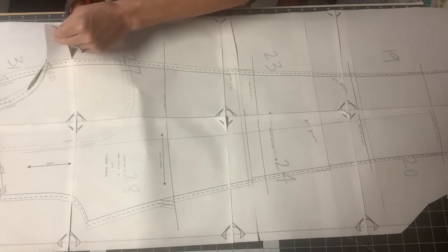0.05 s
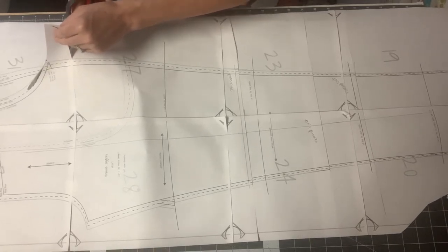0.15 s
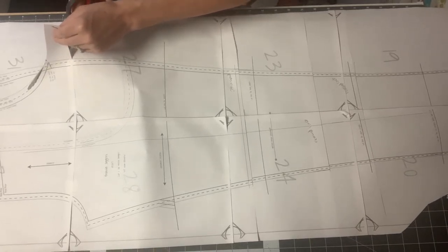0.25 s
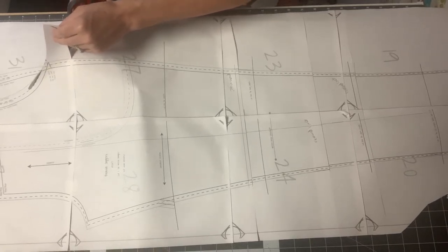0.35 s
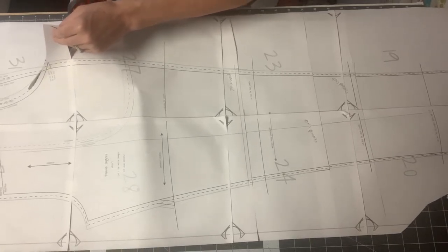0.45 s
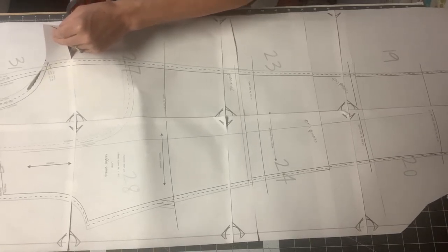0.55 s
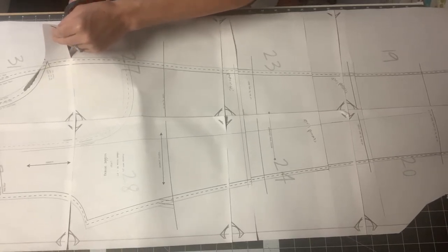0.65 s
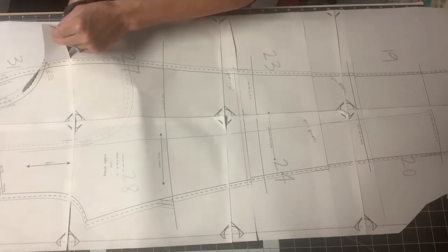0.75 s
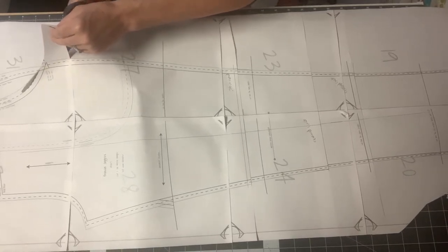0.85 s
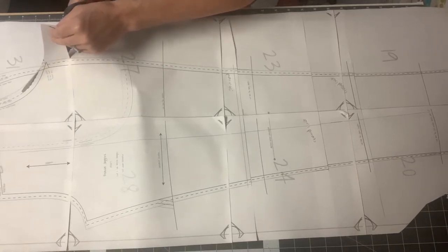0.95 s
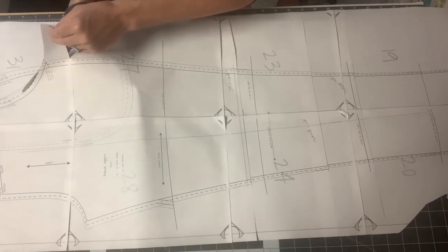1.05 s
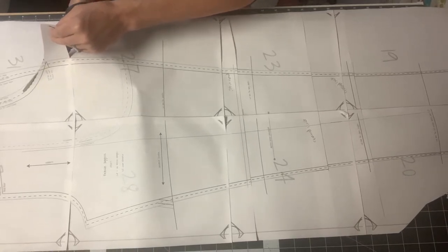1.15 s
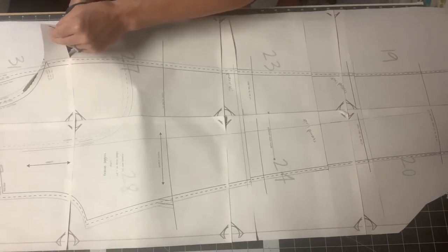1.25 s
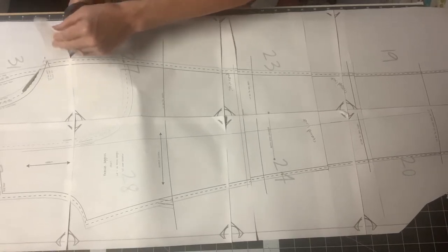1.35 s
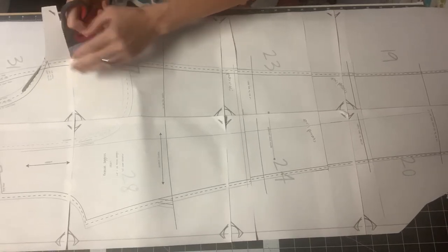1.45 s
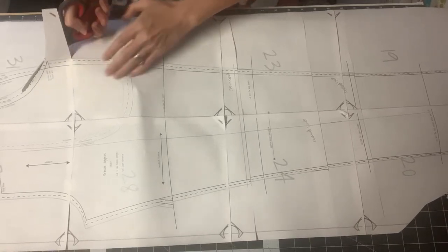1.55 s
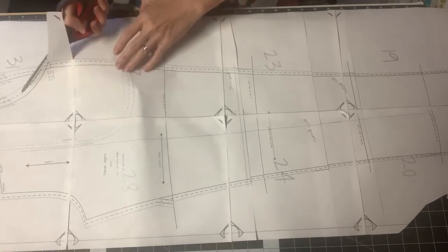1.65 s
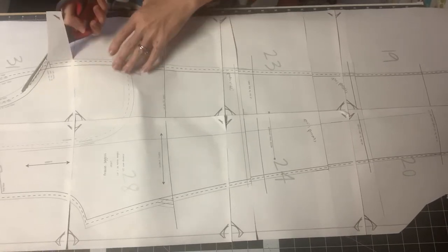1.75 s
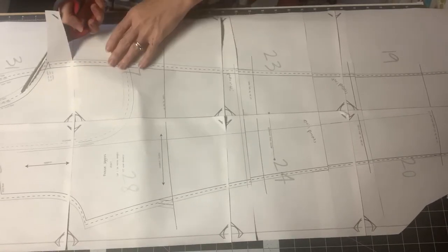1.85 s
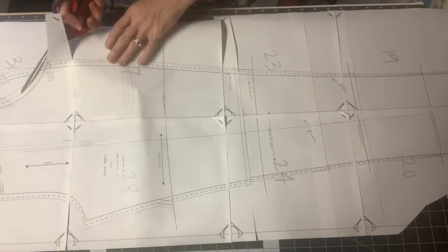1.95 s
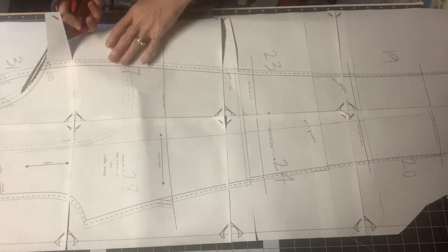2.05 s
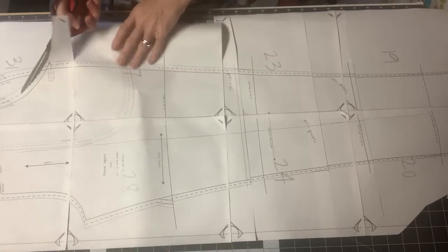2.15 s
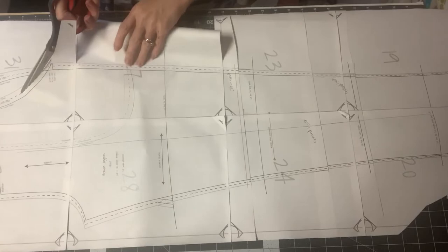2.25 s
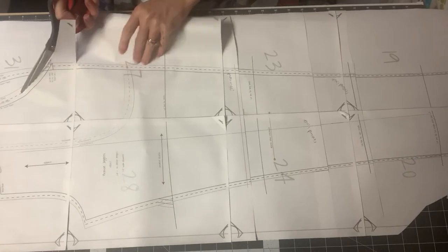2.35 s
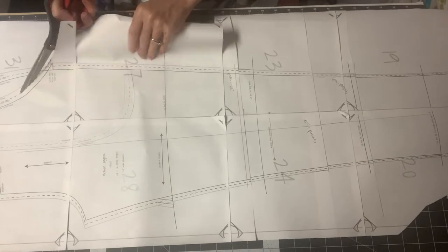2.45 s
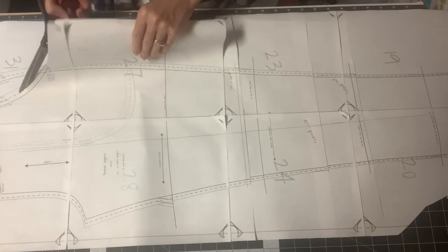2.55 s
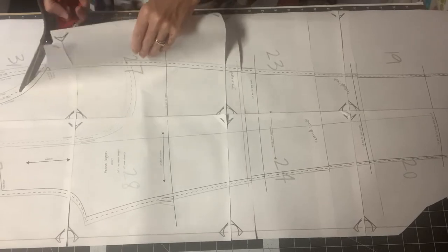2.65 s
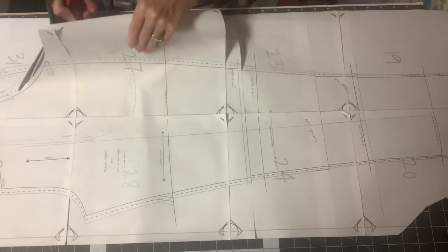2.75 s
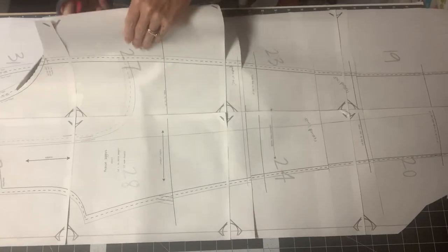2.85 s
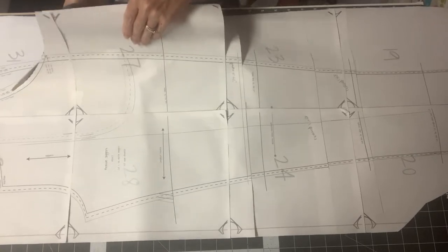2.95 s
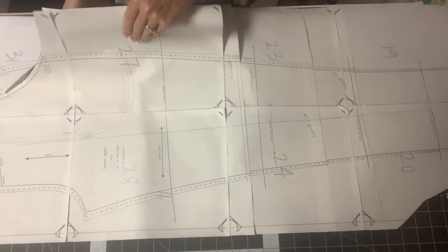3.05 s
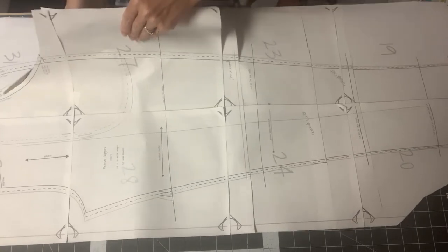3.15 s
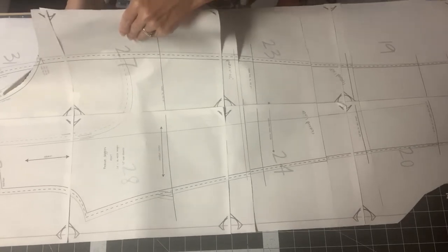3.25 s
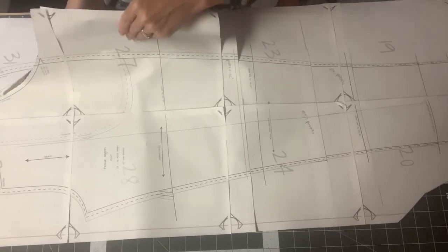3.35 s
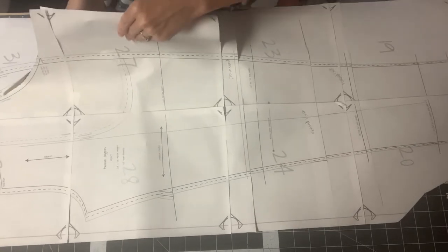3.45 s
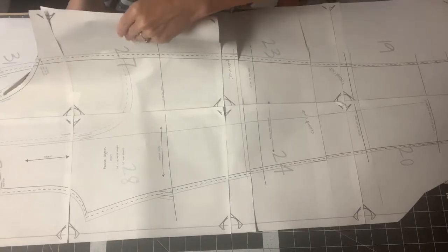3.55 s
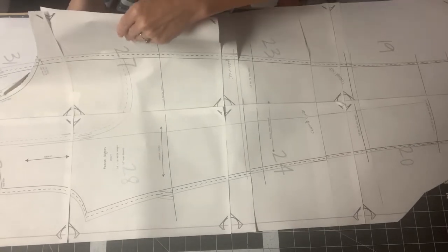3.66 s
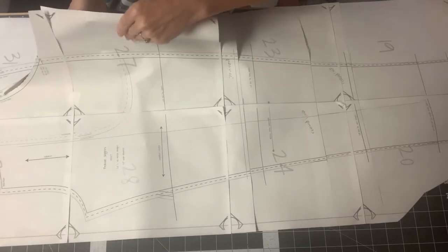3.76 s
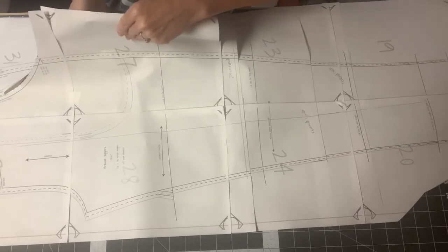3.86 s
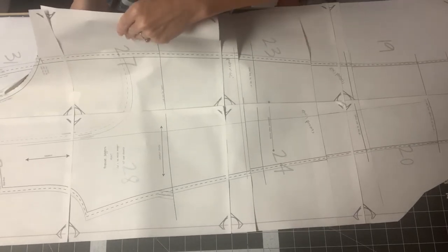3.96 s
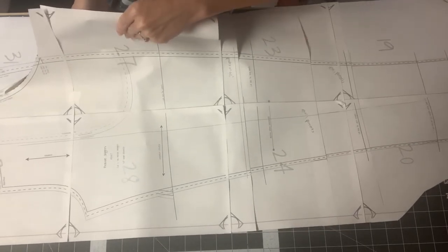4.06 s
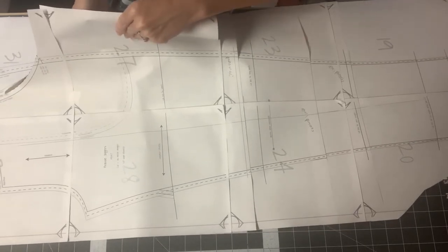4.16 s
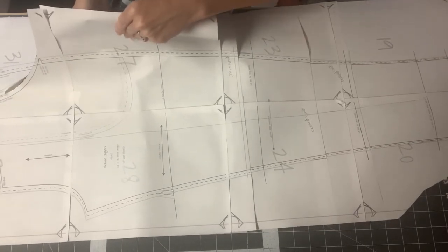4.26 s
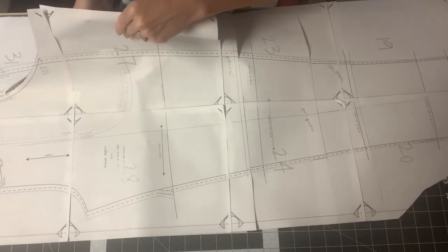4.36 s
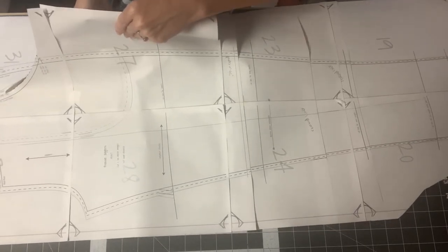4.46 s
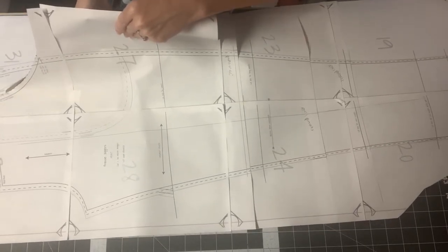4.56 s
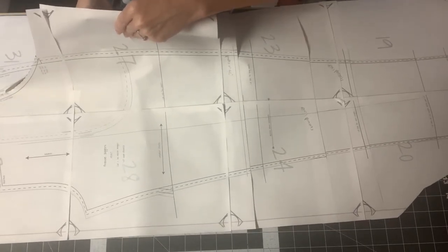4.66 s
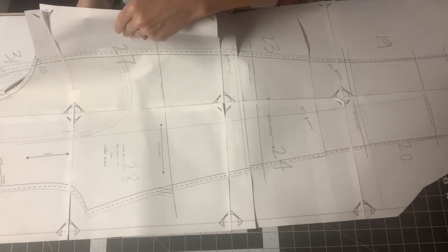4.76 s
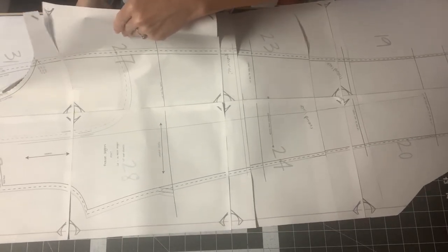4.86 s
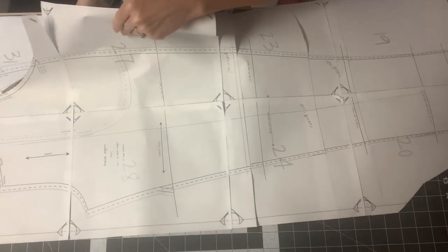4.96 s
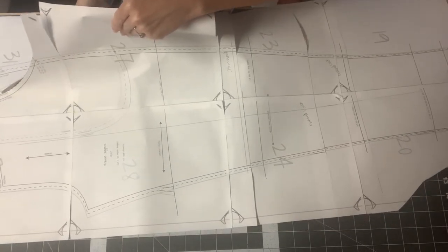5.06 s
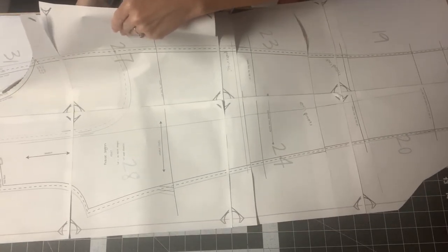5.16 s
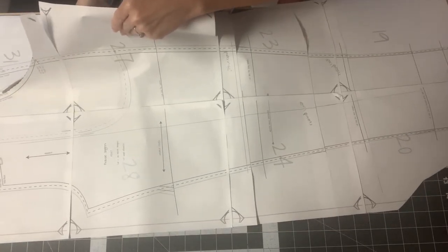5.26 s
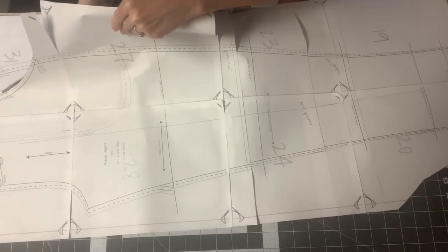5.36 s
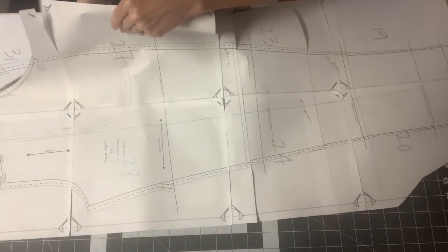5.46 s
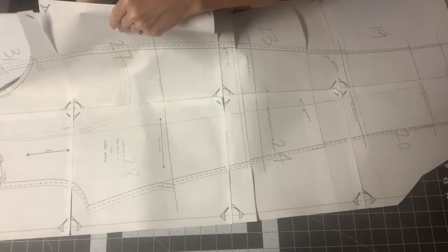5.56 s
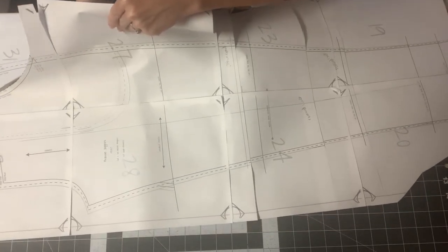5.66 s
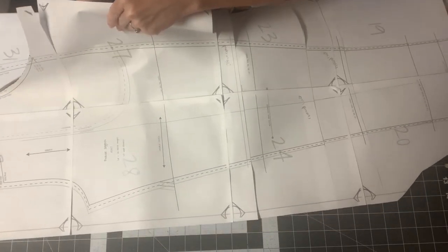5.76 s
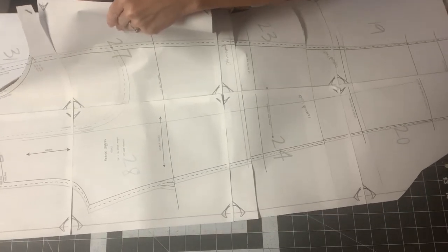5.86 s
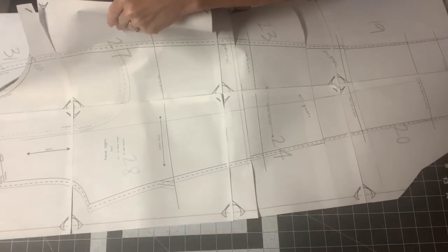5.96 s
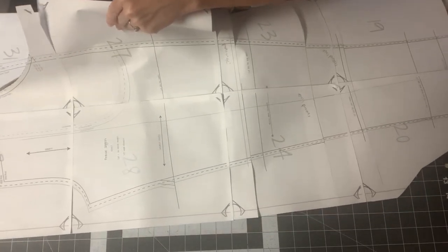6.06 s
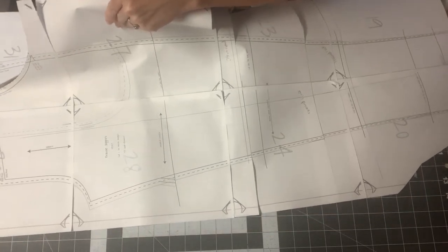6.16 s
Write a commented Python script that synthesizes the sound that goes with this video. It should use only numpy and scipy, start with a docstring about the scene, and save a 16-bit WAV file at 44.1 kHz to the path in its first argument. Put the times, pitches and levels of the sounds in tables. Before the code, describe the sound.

A close stereo microphone pair catches a big sheet of paper handled on a table. Small crisp snips and soft hand strokes start sparsely, then folding brings dull crunches, brittle snaps, swishing rustle and soft low puffs of air. Activity thins to tiny irregular ticks, with a few firmer snips and slides near the end. The room is small, with a very short tail and quiet building rumble.

```python
"""Hands slide over a large paper sewing pattern on a table in a small, quiet room, and short snips begin.
Then the lifted and folded sheet buckles in duller crunches; snips, buckles and strokes mix to the end.
Snips, buckles and sliding are filtered trains of tiny clicks; flaps are damped modes of the sheet,
and puffs are low noise. A close microphone pair hears them with reflections, over rumble and airy hiss."""
import sys
import numpy as np
from scipy import signal
from scipy.fft import rfft, irfft
from scipy.io import wavfile
from scipy.ndimage import uniform_filter1d

SR = 44100
rng = np.random.default_rng(int(sys.argv[2]) if len(sys.argv) > 2 else 0)


def persist_wave(psi):
    """Save psi, clipped to +-1, as 16-bit WAV."""
    counts = np.round(np.clip(psi, -1, 1) * 32767).astype(np.int16)
    wavfile.write(sys.argv[1], SR, np.atleast_2d(counts).T)


N = 273861
TIME = np.arange(N) / SR
HZ = np.fft.rfftfreq(N, 1 / SR)

# Event levels below stand before the band gains, the resonances and the room.
# Fibres breaking in sharp snips and snaps; bright_db raises the treble and lowers the body:
# start_s [s], length_s [s], level_db [dB], bright_db [dB]
SNIP_EVENTS = [(0.23, 0.02, -55.5, 0.5), (0.251, 0.014, -51.5, -1), (0.351, 0.015, -62.5, 0.5),
               (0.5095, 0.0062, -41, 3), (0.553, 0.0067, -52.5, -0.5), (1.157, .01, -57.5, 2.5),
               (1.224, .0031, -52.5, -1.5), (1.253, 0.0056, -54.5, -3), (1.347, 0.0028, -43, 9),
               (1.3501, 0.0028, -40, 1), (1.375, 0.0047, -49, -3), (2.511, 0.0087, -46, 9),
               (2.5286, .0027, -37, 8), (2.724, 0.0038, -39.5, 1.5), (2.734, 0.0032, -26, 1),
               (3.09, .0034, -39.5, -4), (3.211, .0018, -42.5, 1), (3.606, 0.01, -58, -6.5),
               (3.755, .016, -56.5, -3.5), (3.816, 0.0093, -54.5, 0.5), (3.829, 0.011, -54, -5.5),
               (3.865, 0.0065, -55, 5), (3.872, 0.009, -50, -0.5), (3.884, .0083, -56, 2),
               (4.069, .011, -57, -2.5), (4.135, 0.0069, -56, 0), (4.152, 0.0049, -58, -1.5),
               (4.211, 0.0059, -52, -3), (4.241, 0.005, -50.5, -1), (4.302, 0.0042, -51, 1),
               (4.512, 0.016, -53, -1), (4.525, .014, -55, -0.5), (4.648, 0.0069, -51.5, -1),
               (4.687, 0.0065, -49, -0.5), (4.707, 0.0098, -59, -5.5), (5.279, 0.0064, -47, -1.5),
               (5.3, .0025, -41, -1), (5.3301, 0.0094, -41, 0.5), (5.4, 0.002, -48.5, -3),
               (5.426, 0.0037, -50, -2), (5.897, 0.0024, -35.5, 3), (5.903, .0029, -36.5, 1.5),
               (5.942, 0.0046, -44.5, 0), (5.959, 0.0068, -58, 1)]
# Relative spectrum of a snip: frequency_hz [Hz], density_db [dB per Hz]
SNIP_SPECTRUM = [(300, -1.5), (600, -5), (800, -3), (1100, -4), (1600, -5), (2200, -5), (3500, -5.5),
                 (5500, -10), (7000, -13), (8300, -10), (11500, -19.5), (15000, -23.5)]
# Buckling of the sheet; depth_db raises the body and lowers the crunch:
# start_s [s], length_s [s], crunch_top_hz [Hz], level_db [dB], depth_db [dB]
BUCKLE_EVENTS = [(0.626, .008, 1940, -62, -1), (0.685, 0.0037, 1980, -50, -8),
                 (1.5, 0.0059, 2210, -51.5, 0.5), (1.7416, 0.0026, 2240, -43, -3.5),
                 (1.971, 0.011, 4250, -49, -4), (1.986, .021, 4060, -45.5, -6.5),
                 (1.992, 0.014, 4080, -37, -2.5), (2.006, 0.012, 4040, -44.5, -1.5),
                 (2.07, 0.036, 4020, -49.5, -7.5), (2.114, 0.007, 3660, -50, -4.5),
                 (2.164, .0065, 3440, -57.5, -6), (2.224, 0.06, 3500, -61, -7),
                 (2.276, 0.083, 3530, -61, -10), (2.344, 0.0026, 4440, -35.5, -6.5),
                 (2.3538, 0.0026, 3330, -35.5, -7.5), (2.36, 0.023, 3430, -47, -5.5),
                 (2.43, 0.004, 2900, -50.5, -1.5), (2.515, 0.0088, 3350, -39.5, -6.5),
                 (2.528, 0.011, 2720, -38.5, -7.5), (2.618, 0.0015, 3360, -32, 2),
                 (2.633, 0.0017, 2010, -44.5, 7.5), (2.662, 0.0068, 1500, -48.5, 8.5),
                 (2.691, 0.015, 1500, -57.5, 8), (2.737, .0088, 3600, -37, -1.5),
                 (2.782, 0.008, 1530, -54.5, 7), (2.943, 0.023, 2000, -55.5, -1),
                 (3.058, 0.011, 1730, -50, 10.5), (3.238, .023, 1590, -61.5, 6),
                 (3.453, 0.006, 1800, -64, 11), (3.517, 0.026, 2070, -57.5, 4.5),
                 (3.942, 0.021, 2090, -60.5, 5.5), (4.998, .0036, 1790, -47, 9),
                 (5.048, 0.0044, 4600, -41, 7.5), (5.68, 0.0081, 1700, -53, 6),
                 (6.168, 0.0032, 1310, -69, 13.5)]
# Relative spectrum of a buckle: frequency_hz [Hz], density_db [dB per Hz]
BUCKLE_SPECTRUM = [(120, -2), (200, 3.5), (372, -9), (1100, -8.5), (1520, -5), (2320, -0.5), (2630, 0),
                   (7070, -7.5), (8490, -7), (12000, -15.5), (15800, -15.5)]
# Flaps of the released sheet against the table: start_s [s], level_db [dB]
FLAP_EVENTS = [(.252, -57), (.354, -62.5), (0.515, -52.5), (1.16, -59.5), (1.228, -59), (1.353, -46.5),
               (1.995, -51.5), (2.346, -50), (2.739, -62), (3.092, -59.5), (3.215, -56), (3.608, -54),
               (3.757, -58.5), (3.832, -55), (3.87, -51), (4.07, -64.5), (4.153, -60.5), (4.242, -58.5),
               (4.303, -59), (4.527, -54), (4.649, -51.5), (5.051, -52), (5.281, -52), (5.332, -51),
               (5.403, -53.5), (5.428, -58.5), (5.903, -50.5), (5.944, -50.5)]
# Modes of the loose sheet, pitch before detuning: pitch_hz [Hz], level_db [dB], t60_s [s]
SHEET_MODES = [(117, 4.5, 0.046), (215.8, -5.5, 0.19), (242, -3, 0.047), (321.7, 3, 0.092),
               (391.3, -3.5, 0.1), (574, -20.5, 0.044), (693.6, 3, 0.06)]
# Strokes of paper on paper and skin; body and hiss are relative to the rustle:
# start_s [s], length_s [s], rustle_db [dB], body_db [dB], hiss_db [dB]
STROKE_EVENTS = [(.005, 0.028, -63, -4, -6), (0.181, 0.13, -67, -9, -7), (0.51, 0.054, -58.5, -2, -11),
                 (0.607, 0.049, -75, 8, -16), (0.704, 0.023, -59.5, 6.5, -15), (0.754, 0.13, -54, -0.5, -5),
                 (0.897, .095, -67.5, -5, -3.5), (1.122, .17, -73.5, -7, 0.5), (1.355, .04, -65, -2, -1),
                 (1.51, 0.14, -54.5, -0.5, -12), (1.677, 0.045, -61, -1, -18),
                 (1.761, 0.054, -53.5, -5, -5), (1.927, 0.0087, -55, -12, -9.5),
                 (1.993, 0.1, -54.5, -1, -9), (2.101, 0.032, -56, -3, 3), (2.186, 0.16, -53, -6.5, -17.5),
                 (2.352, 0.054, -50.5, -8, 1.5), (2.496, .1, -51, -7, 0.5), (2.623, 0.071, -50.5, 3, 0),
                 (2.739, 0.062, -51, 2, 2), (2.829, 0.038, -54.5, -4, -2.5), (2.909, 0.12, -58.5, -1.5, -4),
                 (3.055, 0.082, -50.5, -2.5, -6.5), (3.147, 0.091, -54.5, -8, -0.5),
                 (3.232, .06, -51, 2.5, -2), (3.335, 0.066, -63.5, -3.5, -3.5),
                 (3.42, 0.049, -56, 0.5, -8.5), (3.544, 0.18, -72, -4.5, -7), (3.814, 0.095, -65, 4, -3.5),
                 (4.067, 0.094, -65.5, 0.5, -5), (4.25, 0.053, -65, 5, 1), (4.523, 0.034, -76, 9, 4),
                 (4.669, 0.038, -63.5, 5, -1.5), (4.912, 0.12, -58.5, 1, -10),
                 (4.992, 0.091, -56, 0.5, -10.5), (5.128, 0.11, -67.5, 0.5, -4.5),
                 (5.337, 0.048, -65.5, 6, -2), (5.576, 0.1, -51.5, -0.5, -5.5),
                 (5.752, 0.047, -67, 11, -11), (5.812, 0.047, -59, 5, -0.5), (5.935, 0.051, -64, 4.5, 0.5),
                 (6.093, .1, -71.5, -5, -4)]
# Relative spectrum of sliding paper: frequency_hz [Hz], density_db [dB per Hz]
SLIDE_SPECTRUM = [(250, -8), (420, -4), (600, -4.5), (850, -2.5), (1100, -3.5), (1700, 0.5), (2600, -7.5),
                  (3600, -9), (5500, -13), (8300, -17), (11500, -25), (15000, -29)]
# Soft pushes of air from the moving sheet: start_s [s], length_s [s], level_db [dB]
PUFF_EVENTS = [(0.665, 0.17, -69.5), (1.348, .064, -54), (2.05, 0.13, -58.5), (2.321, .07, -52.5),
               (2.611, 0.12, -53), (2.71, 0.1, -54.5), (3.039, 0.055, -59.5), (3.125, 0.11, -54),
               (5.592, .11, -58.5)]
# Resonances of the space between paper, table and body: pitch_hz [Hz], width_hz [Hz], level_db [dB]
HOLLOW_MODES = [(602, 110, -9.5), (991, 40, -5.5), (1300, 22, -11), (1480, 33.1, -6), (1614, 33, -2.5),
                (2240, 20, -3.5), (2900, 39, -20.5), (3164, 29, -9)]
# Decay time of the room: frequency_hz [Hz], t60_s [s]
ROOM_DECAY = [(150, 0.19), (500, 0.17), (1500, 0.08), (4000, 0.15), (8000, 0.12), (15000, 0.15)]
# Sound the two microphones do not share: frequency_hz [Hz], level_db [dB]
UNSHARED_LEVEL = [(150, -15.5), (1000, -12.5), (2500, -3.5), (4500, -2.5), (8000, -8), (15000, -27.5)]
# Balance of the pair, left minus right: frequency_hz [Hz], difference_db [dB]
PAIR_BALANCE = [(250, 0.74), (1000, 0.17), (2500, -2), (4000, -0.93), (6000, -0.7), (12000, 0.42)]
# Phase lag of the right side: frequency_hz [Hz], lag_rad [rad]
RIGHT_LAG = [(0, 0), (1800, .25), (3000, .7), (4600, 3.1), (7150, 9.4), (9550, 15.7), (16800, 34.6)]
# Relative spectrum of the building's rumble: frequency_hz [Hz], density_db [dB per Hz]
RUMBLE_SPECTRUM = [(12, -44), (20, -13.5), (38, -3), (64, 0), (80, -1.5), (96, -15), (113, -5.5), (129, -8),
                   (171, -41), (190, -24), (250, -72.5), (420, -120)]
# Relative spectrum of the airy hiss: frequency_hz [Hz], density_db [dB per Hz]
AIR_SPECTRUM = [(170, 0), (300, -12), (600, -17), (900, -29.5), (1600, -28.5), (3000, -35.5), (5500, -35),
                (8000, -38), (11000, -48.5), (14000, -58.5)]

STRAIN_S = .008  # the paper strains audibly for this long before it gives
# A stroke swells, sags while it is held and dies away; resting hands keep up a faint rustle.
SWELL_DB_PER_S, SAG_DB, RELEASE_DB_PER_S, REST_DB = 522, 2, 349.5, -91
EDGE_HZ = 16050  # upper band limit of the recorder


def gain_of(db):
    """Level principle: amplitude is ten to the power of decibels over twenty."""
    return 10 ** (np.asarray(db) / 20)


def evened(x):
    """Normalisation: the signal is scaled to a root mean square of one."""
    return x / np.sqrt(np.mean(x ** 2) + 1e-20)


def at_level(x, db, length):
    """Energy equivalence: each channel gets the energy of a steady level db held for length seconds."""
    energy = (x ** 2).sum(1, keepdims=True) + 1e-20
    return x * gain_of(db) * np.sqrt(length * SR / energy)


def read(points, hz):
    """Interpolation of a table along a logarithmic frequency axis."""
    table_hz, value = np.transpose(points)
    return np.interp(np.log(hz + 1), np.log(table_hz + 1), value)


def add(mix, s, sound):
    """Superposition: a sound is summed into the mix from time s, cut at the end."""
    part = mix[:, round(s * SR):][:, :sound.shape[1]]
    part += sound[:, :part.shape[1]]


def band(x, lo_hz, hi_hz, order=3):
    """Causal Butterworth band-pass filtering."""
    edges_hz = [lo_hz, min(hi_hz, .48 * SR)]
    return signal.sosfilt(signal.butter(order, edges_hz, "bandpass", fs=SR, output="sos"), x)


def click(spectrum, size=1024):
    """Minimum phase: the Hilbert transform of a log spectrum gives its causal click."""
    level_db = np.maximum(read(spectrum, abs(np.fft.fftfreq(size, 1 / SR))), -70)
    log_gain = np.log(gain_of(level_db))
    return np.fft.ifft(np.exp(np.conj(signal.hilbert(log_gain)))).real[None, :size // 2]


def fibres(size, per_s, spread_db):
    """Random point process: clicks of uneven size, in a shared train and one the microphones do not share."""
    sizes = gain_of(spread_db * np.minimum(rng.exponential(1, (2, size)), 4))
    strengths = sizes * rng.standard_normal((2, size))
    return strengths * (rng.random((2, size)) < per_s / SR)


def burst(length, rise, fall, per_s, spread_db, colour, size=4096):
    """Fracture after strain: clicks creep in, break loose and die away; the bent patch resonates with them."""
    t = np.arange(size) / SR - STRAIN_S
    creep = 0.18 * np.exp(np.minimum(t, 0) / 0.0034)
    onset = creep + 1 - np.exp(-np.maximum(t, 0) / rise)
    decay = np.exp(-np.maximum(t - length, 0) / fall - .5 * np.clip(t / length, 0, 1))
    train = fibres(size, per_s, spread_db) * onset * decay
    hz = np.fft.rfftfreq(size, 1 / SR)
    pitches = np.geomspace(700, 5500, num=5) * 2 ** rng.uniform(-.4, .4, 5)
    ringing = sum(1 / (1 + 2j * (hz - pitch) / 220) for pitch in pitches)  # each 220 Hz wide
    patch = 1 + gain_of(6.0) * ringing
    return irfft(rfft(train) * rfft(colour, size) * patch, size)


def snips(treble_gain_db=-1.9, crack_gain_db=0.5, body_gain_db=-2.0):
    """Brittle fracture: fibres break in a rush of a few milliseconds, heard as body, crack and treble."""
    out, colour = np.zeros((2, N)), click(SNIP_SPECTRUM)
    for s, length, db, bright_db in SNIP_EVENTS:
        x = burst(length, rise=0.00072, fall=0.001, per_s=9800, spread_db=5, colour=colour)
        treble = at_level(band(x, 5150, 19000), db + bright_db + treble_gain_db, length)
        crack = at_level(band(x, 1610, 4630), db + crack_gain_db, length)
        body = at_level(band(x, 395, 1770), db - bright_db + body_gain_db, length)
        add(out, s - STRAIN_S, treble + crack + body)
    return out


def buckles(body_gain_db=-.8, crunch_gain_db=-0.27, fizz_gain_db=-9, fizz_db_per_octave=5):
    """Buckling: creases pop; the bend sets the corner of strong radiation, and a tighter bend fizzes more."""
    out, colour = np.zeros((2, N)), click(BUCKLE_SPECTRUM)
    for s, length, top_hz, db, depth_db in BUCKLE_EVENTS:
        x = burst(length, rise=0.0011, fall=0.0032, per_s=4500, spread_db=2.5, colour=colour)
        body = at_level(band(x, 484, 1230), db + depth_db + body_gain_db, length)
        crunch = band(x, max(0.3 * top_hz, 1000), max(top_hz, 1500), order=6)
        crunch = at_level(crunch, db - depth_db + crunch_gain_db, length)
        fizz_db = db + fizz_db_per_octave * np.log2(top_hz / 3300) + fizz_gain_db
        fizz = at_level(band(x, 2940, 17000), fizz_db, length)
        add(out, s - STRAIN_S, body + crunch + fizz)
    return out


def flap(size=8192, detune_share=.1):
    """Modal vibration: the released sheet swings in a few damped modes that shift with the grip."""
    t = np.arange(size) / SR
    hz, db, t60 = np.transpose(SHEET_MODES)[:, :, None]
    detune, phase = rng.uniform(-1.1, 1, (2, len(SHEET_MODES), 1))
    swing = np.sin(2 * np.pi * hz * (1 + detune_share * detune) * t + np.pi * phase)
    modes = gain_of(db - 60 * t / t60) * swing
    onset = 1 - np.exp(-t / 0.0062)
    return np.tile(modes.sum(0) * onset, (2, 1))


def flaps():
    """Free vibration: after firm snips and buckles the sheet swings back."""
    out = np.zeros((2, N))
    for s, db in FLAP_EVENTS:
        add(out, s, at_level(flap(), db, 0.024))
    return out


def stroke_levels(rest_body_db=-3, rest_hiss_db=-4):
    """Incoherent addition: powers of overlapping strokes sum to levels in dB of body, rustle and hiss."""
    t = TIME[::64]
    rest_db = REST_DB + np.array([[rest_body_db], [0], [rest_hiss_db]])
    power = np.tile(gain_of(rest_db) ** 2, len(t))
    for s, length, db, body_db, hiss_db in STROKE_EVENTS:
        age = t - s
        swell_db = SWELL_DB_PER_S * np.minimum(age, 0)
        sag_db = SAG_DB * (np.clip(age / length, 0, 1) - .5)
        release_db = RELEASE_DB_PER_S * np.maximum(age - length, 0)
        shape_db = swell_db - sag_db - release_db
        power = power + gain_of(db + shape_db + np.array([[body_db], [0], [hiss_db]])) ** 2
    return [np.interp(TIME, t, 10 * np.log10(p)) for p in power]


def hand_echo(x, share=0.34, delay_s=0.001335, swing=0.298):
    """Comb interference: the moving hand's delayed reflection makes bands of colour drift."""
    drift = evened(irfft(rfft(rng.standard_normal(N)) * (HZ < 3), N))  # slower than 3 Hz
    at = np.arange(N) - SR * delay_s * np.exp(swing * drift)
    return x + share * np.array([np.interp(at, np.arange(N), side) for side in x])


def crinkles(per_s=260, spread_db=4.0, cycles=3.6, low_hz=600, high_hz=3200, count=24, size=2048):
    """Snap-through: small dents flip at random, each ringing for a few cycles at one of several pitches."""
    t, out = np.arange(size) / SR, np.zeros((2, N))
    for hz in np.geomspace(low_hz, high_hz, count):
        age = hz * t / cycles
        dent = np.sqrt(age) * np.exp(-2 * age) * np.sin(2 * np.pi * hz * t)
        out += signal.oaconvolve(fibres(N, per_s / count, spread_db), dent[None], axes=1)[:, :N]
    return evened(out)


def sliding(body_gain_db=-3, rustle_gain_db=-3.5, hiss_gain_db=-2.2, crinkle_db=-6, catch_db=1.0):
    """Stick-slip friction: tiny slips and crinkles lie under a smooth hiss as contact catches and lets go."""
    body_db, rustle_db, hiss_db = stroke_levels()
    wander = uniform_filter1d(uniform_filter1d(rng.standard_normal(N), size=300), size=200)
    catching_db = catch_db * evened(wander)
    colour = click(SLIDE_SPECTRUM)
    coarse_clicks = fibres(N, per_s=5000, spread_db=3)
    coarse = hand_echo(signal.oaconvolve(coarse_clicks, colour, axes=1)[:, :N])
    fine_clicks = fibres(N, per_s=15000, spread_db=4.0)
    fine = hand_echo(signal.oaconvolve(fine_clicks, colour, axes=1)[:, :N])
    # the catching is strongest in the body and weakest in the hiss
    body = evened(band(coarse, 210, 1306)) * gain_of(body_db + body_gain_db + catching_db)
    rustle = evened(band(coarse, 1120, 4000)) * gain_of(rustle_db + rustle_gain_db + 0.49 * catching_db)
    hiss = evened(band(fine, 4400, 21000)) * gain_of(hiss_db + hiss_gain_db + .25 * catching_db)
    crinkling = crinkles() * gain_of((body_db + rustle_db) / 2 + crinkle_db)
    return body + rustle + hiss + crinkling


def puffs(low_hz=45, high_hz=210):
    """Volume displacement: each swing of the sheet is a soft low push of air, made of band-passed noise."""
    out = np.zeros((2, N))
    for s, length, db in PUFF_EVENTS:
        swing = np.sin(np.pi * np.minimum(TIME[:SR // 4] / length, 1))
        air_push = rng.standard_normal((2, len(swing))) * swing
        add(out, s, at_level(band(air_push, low_hz, high_hz, order=2), db, length))
    return out


def hollow(x, dip_hz=850, dip_width_hz=260, dip_depth=0.3):
    """Resonance and cancellation: narrow modes ring, and the table's echo cuts a dip."""
    ring = sum(gain_of(db) / (1 + 2j * (HZ - hz) / width_hz) for hz, width_hz, db in HOLLOW_MODES)
    dip = 1 - dip_depth / (1 + 2j * (HZ - dip_hz) / dip_width_hz)
    return irfft(rfft(x) * (1 + ring) * dip, N)


def room(x, early_db=-11, late_db=-12, early_s=0.0083):
    """Reverberation: quick reflections from table and body, then a short tail with a decay set by frequency."""
    t = np.arange(SR // 2) / SR
    signs = rng.choice([-1., 1.], (2, len(t)))
    taps = signs * (rng.random((2, len(t))) < 4000 / SR)  # 4000 reflections per second
    early = taps * (t > .002) * np.exp(-t / early_s)
    tail_noise = rng.standard_normal(taps.shape) * (t > .009)
    hz, when, z = signal.stft(tail_noise, SR, nperseg=256)
    decay = gain_of(-60 * when / read(ROOM_DECAY, hz)[:, None])
    late = signal.istft(z * decay, SR, nperseg=256)[1][:, :len(t)]
    response = at_level(early, early_db, 1 / SR) + at_level(late, late_db, 1 / SR)
    return signal.fftconvolve(x, response, axes=1)[:, :N]


def microphones(x):
    """Interaural-style difference: a mostly shared sound, with level balance and a lag on the right side."""
    shared, other = rfft(x)
    other = other * gain_of(read(UNSHARED_LEVEL, HZ))
    lean = gain_of(read(PAIR_BALANCE, HZ) / 2)  # half of the difference on each side
    lag = np.exp(-1j * np.interp(HZ, *np.transpose(RIGHT_LAG)))
    left = (shared + other) * lean
    right = (shared - other) * lag / lean
    return irfft(np.array([left, right]), N)


def background(rumble_db=-55.5, air_db=-69.5, rumble_width=.06, air_width=0.47):
    """Stationary noise: building rumble nearly alike on both sides, and a wider faint airy hiss."""
    rumble_mid, rumble_side, air_mid, air_side = rfft(rng.standard_normal((4, N)))
    sides = np.array([[1], [-1]])
    rumble = rumble_mid + rumble_width * sides * rumble_side
    rumble = irfft(rumble * gain_of(read(RUMBLE_SPECTRUM, HZ)), N)
    air = air_mid + air_width * sides * air_side
    air = irfft(air * gain_of(read(AIR_SPECTRUM, HZ)), N)
    return gain_of(rumble_db) * evened(rumble) + gain_of(air_db) * evened(band(air, 140, 17000))


def scene():
    """Superposition of direct and reflected paper sound at the microphones, over the background."""
    paper = hollow(snips() + buckles() + flaps() + sliding()) + puffs()
    return microphones(paper + room(paper)) + background()


def record(dry):
    """Band limitation: the recorder's linear-phase low-pass removes the highest treble."""
    lowpass = signal.firwin(511, EDGE_HZ, window=("kaiser", 9), fs=SR)
    return signal.oaconvolve(dry, lowpass[None], "same")


dry = scene()
out = record(dry)
persist_wave(out)
```